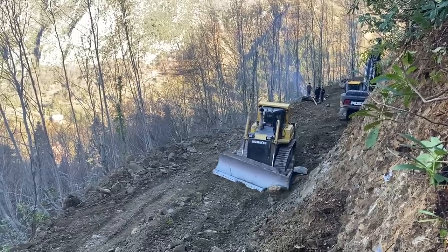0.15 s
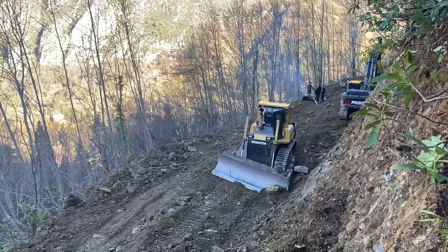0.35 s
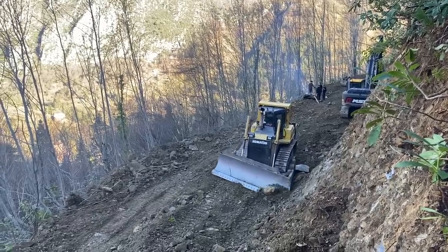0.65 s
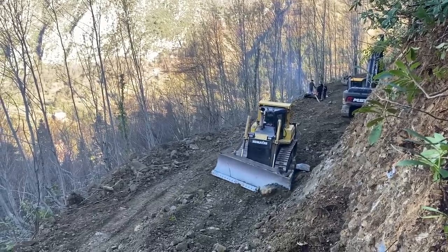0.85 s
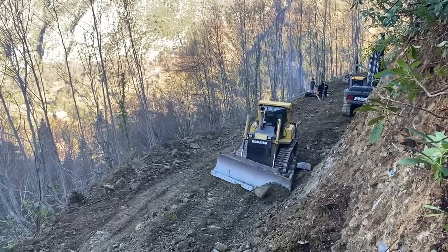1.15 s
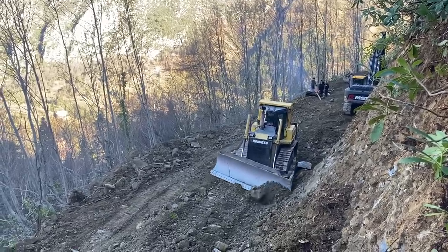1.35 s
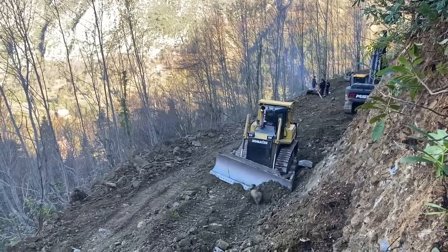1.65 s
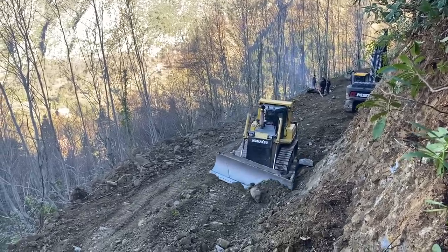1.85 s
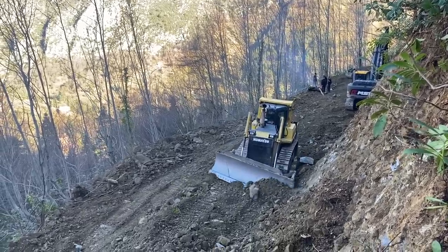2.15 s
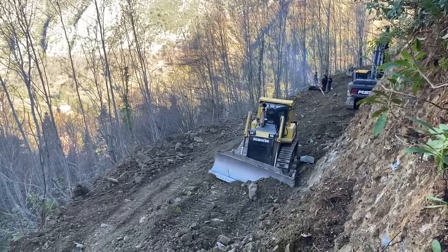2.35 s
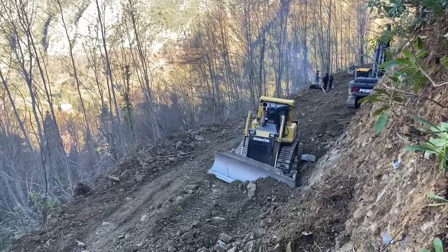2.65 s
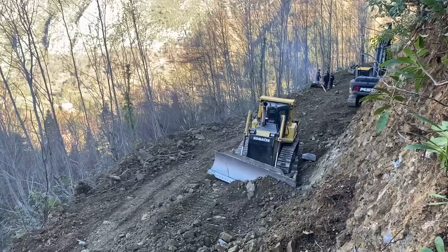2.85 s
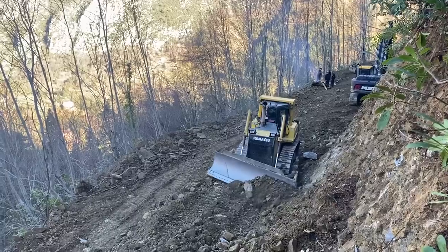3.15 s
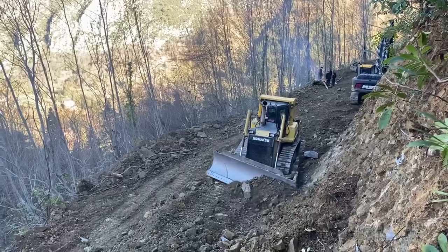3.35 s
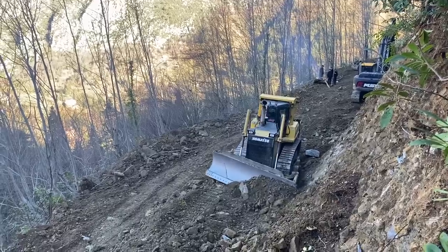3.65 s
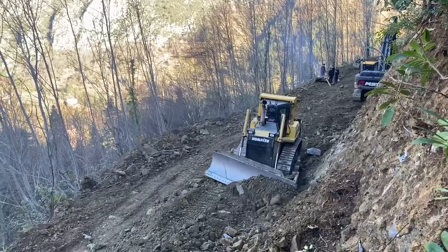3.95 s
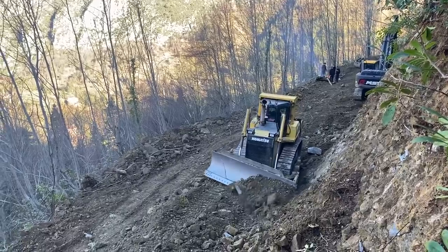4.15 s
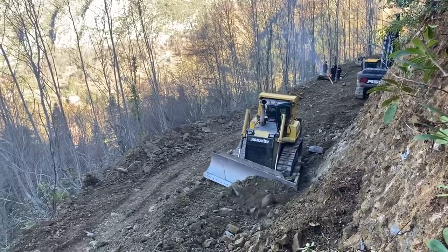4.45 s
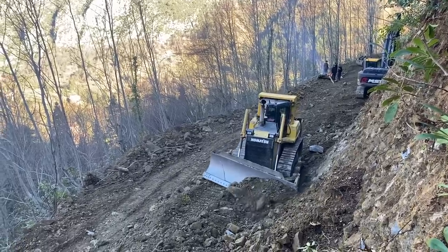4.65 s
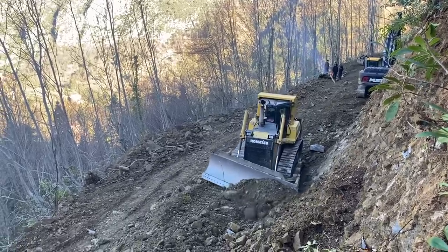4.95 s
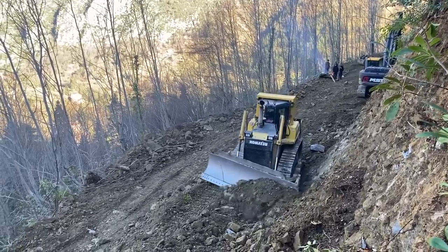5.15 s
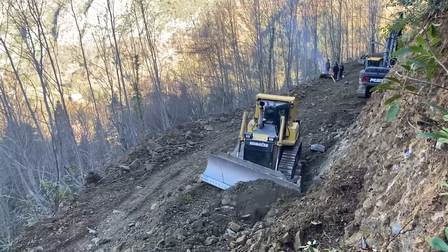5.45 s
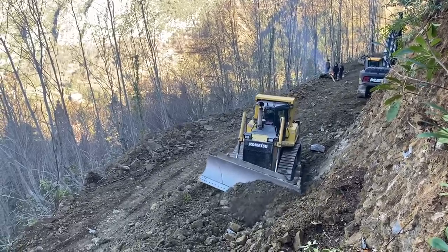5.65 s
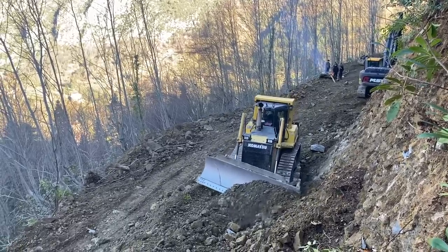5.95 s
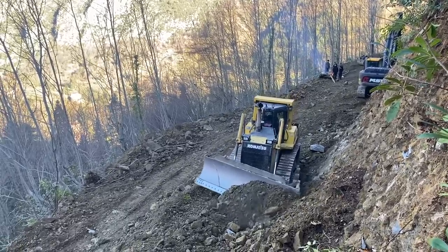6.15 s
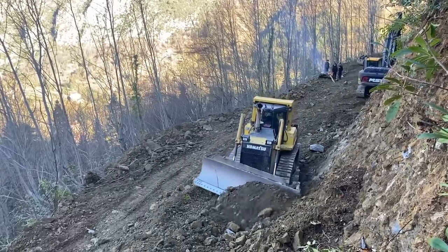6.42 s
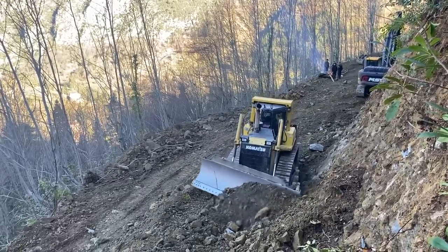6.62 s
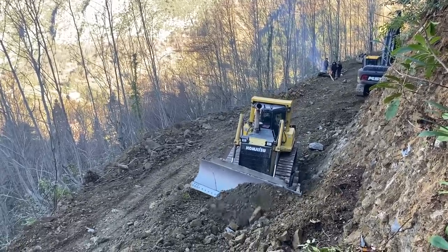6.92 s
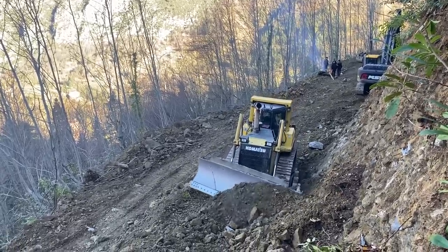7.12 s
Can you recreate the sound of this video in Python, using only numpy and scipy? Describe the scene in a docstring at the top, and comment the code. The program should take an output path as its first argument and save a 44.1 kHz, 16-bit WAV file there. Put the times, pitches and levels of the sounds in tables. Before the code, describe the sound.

A six-cylinder diesel drones low and steadily, clattering, with a very high, thin turbo whistle that climbs. Tracks crunch on stones and the ground rumbles. Scrapes, short stone squeals and knocks come first; a dense burst of heavy thumps, clanks and tumbling rocks follows just after two seconds. Then it calms to engine and sparse knocks, five even track slaps, and a faint gear whine. Open hillside, stereo microphone at some thirty metres.

```python
"""A six-cylinder diesel drones and clatters under a high turbo whistle: a crawler dozer at some thirty metres.
It pushes rocky soil along a hillside track, caught by a microphone with two ports.
Tone lines, a repeating pattern and pulsed noise make the engine; shaped noise makes soil, rumble and groan.
Struck modes make rock and steel ring, sinking tones make boulders thump, wavering tones make stones squeal.
Later the track shoes slap in an even series, and a gear whines near the end."""
import sys
import numpy as np
from scipy import signal
from scipy.fft import rfft, irfft, next_fast_len
from scipy.io import wavfile
from scipy.ndimage import map_coordinates

SR = 44100
rng = np.random.default_rng(int(sys.argv[2]) if len(sys.argv) > 2 else 0)


def bounce(signal):
    """Save signal as a 16-bit WAV file at the path given by the first command-line argument."""
    frames = np.transpose(np.atleast_2d(signal))
    limited = np.clip(frames, -1, 1)
    pcm = np.round(limited * 32767).astype(np.int16)
    wavfile.write(sys.argv[1], SR, pcm)


N = 321048
CYLINDERS = 6
HEAVE_ATTACK_S = 0.019  # shared by the heaves and the groans

# colour of steel grinding on stone, also lent to the valve buzz: freq_hz [Hz], relative_level_db [dB]
GRIND_SPECTRUM = [(110, -32), (165, 1.5), (243, -10), (275, -1), (380, -2.5), (451, -4), (690, -3),
                  (962, -10), (1070, -8.5), (1300, -19), (1440, -15), (2170, -24.5), (2360, -21),
                  (2800, -28), (3640, -59), (6160, -120)]
# colour of a dry crack: freq_hz [Hz], relative_level_db [dB]
CRACK_SPECTRUM = [(600, -21), (1600, -2), (2700, 3.5), (4300, 0.5), (6500, -13), (12000, -47)]
# modes of the soil-damped blade and track frame: mode_hz [Hz], relative_level_db [dB], t60_s [s]
STEEL_MODES = [(386.2, 5, 0.19), (592, 4, 0.074), (727, 6.5, 0.07), (880, 6, 0.071), (1023, -5, 0.13),
               (1185, -9, 0.16), (1433, -4, 0.18), (1854, -10.5, 0.22), (2037, -8.5, 0.12),
               (2454, -7, 0.095), (3060, -31, 0.1), (3104, -8.5, 0.092)]


def amp(db):
    """Decibels to gain."""
    return 10 ** (np.asarray(db) / 20)


def unit(x):
    """Scale to rms 1."""
    return x / np.sqrt(np.mean(x ** 2) + 1e-20)


def along(points, hz):
    """Interpolate (Hz, value) points on a log frequency axis."""
    f, v = np.transpose(points)
    return np.interp(np.log(hz + 1), np.log(f + 1), v)


def curves(rows):
    """One value per sample for each column after the time."""
    s, *cols = np.transpose(rows)
    return [np.interp(np.arange(N) / SR, s, c) for c in cols]


def wobble(rate):
    """A smooth random curve with rate knots a second."""
    knots = rng.standard_normal(int(N * rate / SR) + 4)
    return map_coordinates(knots, [np.arange(N) * rate / SR])


def complex_wobble(rate):
    """A random amplitude and phase, for tones that flutter."""
    return wobble(rate) + 1j * wobble(rate)


def filtered(x, response):
    """Pass x through a complex response of frequency."""
    m = next_fast_len(N + SR // 2)
    return irfft(rfft(x, m) * response(np.fft.rfftfreq(m, 1 / SR)), m)[..., :N]


def noise(response, grain_db=0):
    """Stereo noise of rms 1, roughened by grain_db; scattering on the slope makes the treble less alike."""
    # likeness of left and right: freq_hz [Hz], correlation [0 to 1]
    likeness = [(60, .997), (150, .99), (300, .965), (900, .96), (1500, .75), (2800, .78), (3800, .96),
                (5300, .7), (6700, .96), (8000, .85), (15000, .88)]

    def mid_and_side(hz):
        angle = np.arccos(np.clip(along(likeness, hz), 0, 1)) / 2
        return response(hz) * np.array([np.cos(angle), np.sin(angle)])

    white = rng.standard_normal((2, N))
    if grain_db:
        white = white * amp(grain_db * wobble(1400))
    mid, side = filtered(white, mid_and_side)
    return unit(np.array([mid + side, mid - side]))


def coloured(spectrum, grain_db=0):
    """Stereo noise with a (Hz, dB) spectrum."""
    return noise(lambda hz: amp(along(spectrum, hz)), grain_db)


def swell(start, end, attack, t60):
    """Envelope that rises from the start, holds until the end and dies away."""
    t = np.arange(N) / SR
    return np.clip((t - start) / attack, 0, 1) * amp(-60 * np.clip((t - end) / t60, 0, 3))


def bursts(times, sizes, rise, t60):
    """Envelope of blows that swell and die; their powers add."""
    t = np.arange(SR // 2) / SR
    index = np.clip(np.asarray(times) * SR, 0, N - 1).astype(int)
    power = np.bincount(index, sizes ** 2, N)
    shape = (1 - np.exp(-t / rise)) * amp(-60 * t / t60)
    return np.sqrt(np.abs(signal.fftconvolve(power, shape ** 2)[:N]))


def ringing(modes, times, levels_db, spots_hz, varied_db):
    """Each blow finds the modes at new tunings and phases, strongest near the pitch of the struck spot."""
    hz, mode_db, t60 = np.transpose(modes)[:, :, None]
    t = np.arange(SR // 4) / SR
    out = np.zeros(N + SR)
    for start, db, spot in zip(times, levels_db, spots_hz):
        strength, detune, phase = rng.standard_normal((3, len(modes), 1))
        # the spot lifts nearby modes by up to 6.5 dB, over 0.17 octaves
        spot_db = 6.5 * np.exp(-(np.log2(hz / spot) / 0.17) ** 2)
        level = amp(mode_db + spot_db + varied_db * strength - 60 * t / t60)
        partials = level * np.sin(2 * np.pi * (hz * (1 + 0.0191 * detune) * t + phase))
        blow = partials.sum(0) * (1 - np.exp(-t / .0024))
        # the level sets the strength of the first seventieth of a second
        out[round(start * SR):][:len(t)] += amp(db) * blow / np.std(blow[:SR // 70])
    return out[:N]


def exhaust(cycle, level_db, waver_db, firing_waver_db, jitter):
    """A clean firing tone, with weaker lines from the unequal cylinders."""
    # exhaust lines: order [multiples of the six-firing cycle], relative_level_db [dB]
    exhaust_lines = [(3, -17), (4, -15), (6, 1), (7, -13.5), (9, -15.5), (10, -18), (12, -22.5),
                     (13, -21.5), (14, -28), (15, -25.5), (16, -42), (17, -26), (18, -18), (19, -40),
                     (20, -17.5), (22, -23), (24, -21.5), (27, -23.5), (30, -28), (32, -26), (37, -23.5),
                     (40, -24), (42, -29), (44, -19), (45, -28.5), (48, -41), (59, -25), (69, -27.5),
                     (70, -40), (78, -35)]
    out = np.zeros(N)
    for order, db in exhaust_lines:
        loose_db = firing_waver_db if order == CYLINDERS else waver_db
        phase = order * (cycle + jitter * wobble(12)) + rng.random()
        out += amp(db + loose_db * wobble(7)) * np.sin(2 * np.pi * phase)
    return np.sqrt(2) * amp(level_db) * out


def buzz(cycle, chug_db, order=1024):
    """Valves and gears repeat one pattern every cycle: a comb of faint lines that chugs once a crank turn."""
    pattern = rng.standard_normal(order)
    looped = map_coordinates(pattern, [cycle % 1 * order], mode="grid-wrap")
    chug = amp(chug_db * np.cos(2 * np.pi * 2 * cycle))  # two crank turns a cycle
    return unit(chug * filtered(looped, lambda hz: amp(along(GRIND_SPECTRUM, hz))))


def clatter(cycle, level_db, sharpness, uneven_db, block_db, hiss_db):
    """Each firing raps the resonant block; fan and injectors hiss in the same pulses."""
    # engine block and cover resonances: centre_hz [Hz], width_hz [Hz], relative_level_db [dB]
    block_modes = [(1040, 106, 2), (1494, 250, 0), (1963, 73, 3.5), (2374, 90, -3), (3180, 82, 0.5),
                   (3866, 180, -2.5), (6270, 110, -8)]
    # hiss colour: freq_hz [Hz], relative_level_db [dB]
    hiss_spectrum = [(600, -28), (1500, -1.5), (2800, 2.5), (4400, 3.5), (5400, 0), (6800, 2.5), (8000, -3),
                     (11000, -4), (13000, -3.5), (16000, -23)]

    def block_response(f):
        total = 0
        for k, (centre, width, db) in enumerate(block_modes):
            resonance = 1j * f * width / (centre * centre - f * f + 1j * f * width)
            total = total + (-1) ** k * amp(db) * resonance
        return total

    firing = cycle * CYLINDERS
    index = firing.astype(int)
    cylinder_db = uneven_db * np.cos(2 * np.pi * index / 3)
    firing_db = cylinder_db + rng.standard_normal(N // 100)[index]  # spread of 1 dB
    rap = unit(amp(firing_db) * np.exp(-sharpness * (firing % 1)))
    block = noise(block_response)
    return amp(level_db) * rap * (amp(block_db) * block + amp(hiss_db) * coloured(hiss_spectrum))


def turbo(scattered, spread_hz, flutter_db, skirt_db, skirt_hz):
    """The compressor's blade tone: a steady part, a part scattered by hot, moving air, and a skirt of hiss."""
    # turbocharger whistle, rising overall: time_s [s], whistle_hz [Hz]
    turbo_pitch = [(0, 12300), (0.45, 12600), (0.68, 12100), (1, 12850), (1.65, 12295), (2.3, 13000),
                   (2.7, 13490), (3.2, 13900), (3.85, 14380), (4.65, 14290), (5, 14420), (5.5, 14800),
                   (5.9, 14910), (6.45, 15540), (6.7, 15620), (7.28, 16280)]
    # whistle level by pitch, low above 15.7 kHz: whistle_hz [Hz], level_db [dB]
    whistle_level = [(12200, -45.5), (13100, -47.5), (14000, -42.5), (15550, -41.5), (15720, -47),
                     (15900, -50)]
    hz, = curves(turbo_pitch)
    tone = np.exp(2j * np.pi * np.cumsum(hz) / SR)
    air = 1 + scattered * complex_wobble(spread_hz) + amp(skirt_db) * complex_wobble(skirt_hz)
    level = amp(along(whistle_level, hz) + flutter_db * wobble(13))
    return level * unit(np.real(tone * air))


def work(rolling_db):
    """Levels in dB of ground rumble and grinding: rolling, with the power of each heave on top."""
    # the blade bites into the bank and heaves rock:
    # start_s [s], length_s [s], rumble_db [dB], grinding_db [dB]
    heaves = [(-.03, 0.031, -21, -21.5), (0.093, 0.2, -24, -22), (0.463, 0.17, -23.5, -21.5),
              (0.75, 0.1, -29, -25.5), (0.878, 0.17, -20.5, -24.5), (1.487, 0.049, -26, -30),
              (2.101, 0.089, -20, -21), (2.314, 0.096, -19, -17), (2.477, 0.11, -18.5, -22),
              (2.655, 0.088, -29, -24), (3.022, 0.095, -23, -39), (6.09, 0.045, -25, -40),
              (6.4, 0.058, -37, -35), (7.068, 0.055, -28, -39)]
    rumble = amp(-25.5 - .5 * np.arange(N) / SR) ** 2  # drifts down half a dB a second
    grind = amp(rolling_db) ** 2
    for s, length, rumble_db, grind_db in heaves:
        push = swell(s, s + length, HEAVE_ATTACK_S, t60=0.49)
        rumble = rumble + (amp(rumble_db) * push) ** 2
        grind = grind + (amp(grind_db) * push) ** 2
    return 10 * np.log10(rumble), 10 * np.log10(grind)


def ground_rumble(level_db):
    """The ground shakes under the rolling tracks: low, shaped noise."""
    # rumble colour: freq_hz [Hz], relative_level_db [dB]
    rumble_spectrum = [(15, -26), (30, -24), (44, -3), (56, 2.5), (72, -0.5), (110, -3), (180, -9.5),
                       (250, -16), (500, -58), (1000, -90)]
    return amp(level_db) * coloured(rumble_spectrum)


def blade_groan():
    """The blade groans as it drags over rock, and again once it is full: a narrow band of low noise."""
    # groans: start_s [s], end_s [s], level_db [dB]
    groans = [(0, .91, -27.5), (6.076, 7.28, -32.5)]
    # groaning blade's colour: freq_hz [Hz], relative_level_db [dB]
    blade_spectrum = [(100, -31), (150, 3.5), (172, 5.5), (200, -36), (300, -58)]
    envelope = sum(amp(db) * swell(s, end, HEAVE_ATTACK_S, t60=1.9) for s, end, db in groans)
    return envelope * coloured(blade_spectrum)


def tracks(level_db, scatter_db, t60, bed_db, shoes_db, count=330):
    """Steel shoes and rollers crunch over stones in many small, uneven blows, over a grinding bed."""
    chance = rng.random((count, 2))
    times = (np.arange(count) + 2 * chance[:, 0]) / count * N / SR
    blows = unit(bursts(times, amp(scatter_db * chance[:, 1]), rise=0.00082, t60=t60))
    bed = amp(bed_db) * coloured(GRIND_SPECTRUM)
    shoes = amp(shoes_db) * blows * coloured(GRIND_SPECTRUM)
    return amp(level_db) * (bed + shoes)


def scraping(rough, grit_db, chatter_db):
    """Gravel slides over the blade, and single stones stick and slip into brief, ragged squeals."""
    # gravel runs over the blade: peak_s [s], level_db [dB], rise_s [s], t60_s [s]
    slides = [(.2, -33, .1, 0.28), (.55, -25, 0.069, 0.42), (.66, -33.5, 0.29, 0.98),
              (2.15, -34, 0.13, 0.18), (2.39, -42, .06, 0.94), (2.68, -34, 0.15, 0.81),
              (2.82, -33, 0.11, 0.16)]
    # stones squealing on steel: start_s [s], pitch_hz [Hz], level_db [dB], length_s [s]
    squeals = [(.385, 4500, -37, .025), (.45, 2400, -33, .025), (.645, 5040, -31, .045),
               (.7, 5030, -37, .03), (1.185, 2430, -36, .03), (1.635, 7090, -38, .03),
               (1.89, 3950, -29.5, .028), (2.38, 4600, -33, .025), (2.78, 4550, -32.5, .04),
               (2.815, 5300, -37, .025), (3.03, 2420, -38, .03), (4.572, 4760, -32, .02),
               (5.915, 3260, -31, .025), (7.16, 6550, -38, .015)]
    # scrape noise colour, strong from 1.5 to 8 kHz; the band near 10 kHz is left quiet: # freq_hz [Hz],
    # relative_level_db [dB]
    scrape_spectrum = [(600, -11), (1500, 21), (3000, 14), (4800, 14.5), (6500, 4.5), (7800, 16.5),
                       (10000, -80), (16000, -13)]
    t = np.arange(N) / SR
    flow = amp(-49) ** 2  # power of the soil always spilling off the blade
    for s, db, rise, t60 in slides:
        flow = flow + (amp(db) * swell(s - rise, s, rise, t60)) ** 2
    out = np.sqrt(flow) * amp(grit_db * wobble(150)) * coloured(scrape_spectrum, grain_db=1)
    for s, hz, db, length in squeals:
        stroke = np.sqrt(np.abs(np.sin(np.pi * np.clip((t - s) / length, 0, 1))))
        pitch = hz * (1 + rough * wobble(900))
        grip = unit(amp(chatter_db * wobble(260)))
        out = out + amp(db) * stroke * grip * np.sin(2 * np.pi * np.cumsum(pitch) / SR)
    return out


def knocks(ring_db, grit_db, slope_db):
    """A rock or shoe crushes against the steel, rings it and thuds into the ground; the slope answers."""
    # knocks of rocks and track shoes on the machine; thud and crack are relative to the level:
    # start_s [s], level_db [dB], thud_db [dB], crack_db [dB], struck_spot_hz [Hz]
    machine_knocks = [(0.162, -21.5, 11, -17, 980), (0.2, -22, -1, -9, 800), (0.451, -20, 6, -7, 640),
                      (0.535, -17.5, 5, -8, 653), (0.931, -27, 12, -15, 820), (1.035, -28, 2, -17, 580),
                      (1.158, -18, -3, -15, 556), (1.189, -24, 10, -15, 740), (1.499, -22.5, 3, -12, 1100),
                      (1.643, -19, -2, -21, 750), (1.704, -26, 5, -16, 740), (1.969, -20, 0, -15, 686),
                      (2.1, -23, -5, -15, 850), (2.128, -19, 0, -4, 940), (2.157, -10.5, 6.5, -15, 880),
                      (2.195, -32, -3, -16, 700), (2.328, -10, -6, -12.5, 845), (2.348, -22, -3, -23, 390),
                      (2.372, -15, -2, -9, 621), (2.394, -19.5, 3, -9, 740), (2.441, -21.5, 7, -10, 785),
                      (2.495, -16, -6, -26, 900), (2.518, -23, -3, -18, 390), (2.572, -17, -8, -8, 590),
                      (2.665, -23, 4, -7, 687), (2.756, -19.5, 0, -10, 640), (3.044, -25, 17.5, -18, 520),
                      (3.321, -28, -4, -16, 695), (3.537, -25, 0, -11, 624), (3.797, -23.5, -5, -8.5, 690),
                      (4.078, -28, -1, -16, 552), (4.164, -24.5, -3, -19, 790), (4.349, -22.5, 8, -12, 609),
                      (5.359, -25, -5, -10, 680), (5.564, -23, -1, -16, 1000), (6.26, -32, -3, -22, 560.6),
                      (6.794, -32, -6, -11, 692), (6.866, -27, 0, -15, 588), (6.91, -22, -5, -16, 890),
                      (7.036, -18, -2, -14, 1207)]
    # colours of the crushing and of the ground's thud: freq_hz [Hz], relative_level_db [dB]
    crush_spectrum = [(60, -34), (200, 5.5), (350, 1), (500, 0.5), (720, 0.5), (1050, -0.5), (1280, -13.5),
                      (1500, -11), (2100, -23), (4000, -24), (9000, -50)]
    thud_spectrum = [(20, -38), (45, -18), (74, 6.5), (110, -1), (165, 3), (280, -18), (700, -61)]
    s, db, thud_db, crack_db, spot_hz = np.transpose(list(machine_knocks) + slaps())
    ring = ringing(STEEL_MODES, s, db + ring_db, spot_hz, varied_db=0.5)
    crunch = bursts(s, amp(db), rise=.0025, t60=.1)
    grit = amp(grit_db) * crunch * coloured(crush_spectrum, grain_db=4.0)
    thud = bursts(s, amp(db + thud_db), rise=0.0046, t60=0.079) * coloured(thud_spectrum)
    crack = bursts(s, amp(db + crack_db), rise=.004, t60=.15) * coloured(CRACK_SPECTRUM, grain_db=5)
    slope = bursts(s, amp(db + slope_db), rise=0.03, t60=0.37) * coloured(crush_spectrum)
    return ring + grit + thud + crack + slope


def snaps():
    """A stone splitting under the tracks gives one short, bright crack."""
    # splitting stones: start_s [s], level_db [dB]
    splits = [(.201, -28), (1.636, -33), (2.568, -18.5), (2.575, -29), (6.396, -35)]
    # splitting colour: freq_hz [Hz], relative_level_db [dB]
    split_spectrum = [(1200, -20), (2600, -2), (4400, -2), (5500, 1), (5850, 10), (6250, 3), (6900, 0),
                      (7400, 9), (8100, -3), (11000, -1), (15000, -4)]
    s, db = np.transpose(splits)
    return bursts(s, amp(db), rise=0.00035, t60=0.057) * coloured(split_spectrum)


def screeches(width, chatter_db, waver):
    """A stone dragged along the blade's edge sticks and slips, so each mode swells and sinks on its own."""
    # drags: start_s [s], length_s [s], level_db [dB], brightness [dB per octave], pitch [ratio]
    drags = [(0.47, .04, -36.5, -3, 1.03), (0.515, 0.055, -30, 0, 1.005), (.595, 0.025, -41, 3, 1),
             (0.647, 0.031, -37, -3, .985), (.7, 0.043, -41, -2, .995)]
    # the edge's high modes: mode_hz [Hz], relative_level_db [dB]
    edge_modes = [(2686, -3), (3725, -5), (3978, -7), (4890, -4), (5060, 0), (5303, -1), (6300, -7),
                  (7542, -3), (8285, -1), (11396, -5), (14720, -9)]
    strokes = [swell(s, s + length, .014, t60=0.24) ** 2 for s, length, *_ in drags]
    bend, = curves([(s + length / 2, ratio) for s, length, _, _, ratio in drags])
    clock = np.cumsum(bend + waver * wobble(44.7)) / SR  # the pitch wavers with the contact
    out = np.zeros(N)
    for hz, mode_db in edge_modes:
        drive = np.zeros(N)
        for (_, _, db, bright, _), stroke in zip(drags, strokes):
            drive += amp(db + bright * np.log2(hz / 5000)) ** 2 * stroke
        ring = np.real(complex_wobble(width * hz) * np.exp(2j * np.pi * hz * clock))
        out += amp(mode_db) * np.sqrt(drive) * ring
    return out * amp(chatter_db * wobble(260)) / np.linalg.norm([amp(db) for _, db in edge_modes])


def clanks():
    """A track link drops onto its roller, ringing bare steel; slapping shoes ring their links too."""
    # dropping links: start_s [s], level_db [dB], struck_spot_hz [Hz]
    link_drops = [(.54, -27, 1795), (1.191, -30, 2390), (2.158, -19, 1066), (2.333, -26, 2390),
                  (2.378, -29, 1545), (7.033, -20.5, 1795), (7.039, -22.5, 1210)]
    # the link's modes: mode_hz [Hz], relative_level_db [dB], t60_s [s]
    link_modes = [(610, 4, .07), (820, -3, .05), (1066, -4, .06), (1210, -2, .07), (1545, -7, .07),
                  (1795, -6.5, .07), (2390, -8, .08), (3690, -13, .06)]
    # each slap rings its link 5 dB below the slap, strongest near 1350 Hz
    slapped_links = [(s, db - 5, 1350) for s, db, *_ in slaps()]
    s, db, spot_hz = np.transpose(list(link_drops) + slapped_links)
    return ringing(link_modes, s, db, spot_hz, varied_db=0)


def thumps():
    """The soil gives under a boulder and swings back for a few cycles, sinking in pitch."""
    # boulders rolling over and dropping: start_s [s], peak_db [dB], settled_pitch_hz [Hz]
    boulders = [(.54, -19, 163), (.905, -15, 68), (.955, -10.5, 74), (1.03, -16, 78), (1.105, -17, 65),
                (2.156, -19, 158), (2.176, -11, 66), (2.334, -4, 76.4), (2.375, -11.5, 152.3),
                (2.41, -10, 71), (2.525, -14, 66), (2.601, -11, 68), (2.859, -8, 78), (3.05, -17, 70),
                (3.114, -14, 68), (3.485, -18, 66.4)]
    rise_s, sag = .014, 0.22  # time to the peak; share by which the pitch starts high
    t = np.arange(SR // 4) / SR
    age = t / rise_s
    out = np.zeros(N + SR)
    for s, db, hz in boulders:
        turns = np.cumsum(hz * (1 + sag * np.exp(-age))) / SR
        swing = np.sin(2 * np.pi * (turns + rng.random()))
        out[round(s * SR):][:len(t)] += amp(db) * age * np.exp(1 - age) * swing
    return out[:N]


def tumble(tick_db, count=44):
    """Loose rocks off the heaved pile strike the blade at random spots, each with a dry tick."""
    start_s, end_s, level_db, spread_db = 2.34, 2.84, -32, 4
    chance = rng.random((count, 3))
    s = start_s + (end_s - start_s) * (np.arange(count) + chance[:, 0]) / count
    db = level_db + spread_db * (2 * chance[:, 1] - 1)
    spot_hz = 600 * 4 ** chance[:, 2]
    ticks = bursts(s, amp(db + tick_db), rise=.0005, t60=0.023) * coloured(CRACK_SPECTRUM, grain_db=4)
    return ringing(STEEL_MODES, s, db, spot_hz, varied_db=5) + ticks


def slaps():
    """Evenly spaced blows of the track shoes, as rows like those of the knocks."""
    # each slap in turn: level_db [dB]
    slap_levels = [-18.3, -19.5, -20.5, -29, -26]
    start_s, period_s = 4.601, .279
    thud_db, crack_db, spot_hz = -7, -21, 880  # thud and crack against the slap
    return [(start_s + k * period_s, db, thud_db, crack_db, spot_hz) for k, db in enumerate(slap_levels)]


def rattles(grit_db, count=6):
    """Slack pins and caught pebbles chatter around each slap of the shoes."""
    lead_s, trail_s = .016, .05  # window around the slap
    below_db, spread_db = -12, 3  # level against the slap
    s, db = np.repeat([row[:2] for row in slaps()], count, axis=0).T
    chance = rng.random((len(s), 3))
    place = (np.arange(len(s)) % count + chance[:, 0]) / count
    s = s - lead_s + (lead_s + trail_s) * place
    db = db + below_db + spread_db * (2 * chance[:, 1] - 1)
    spot_hz = 700 * 2 ** chance[:, 2]
    grit = bursts(s, amp(db + grit_db), rise=.001, t60=0.035) * coloured(CRACK_SPECTRUM, grain_db=0.5)
    return ringing(STEEL_MODES, s, db, spot_hz, varied_db=3.5) + grit


def gear(cycle, waver_db):
    """Meshing drive teeth whine late on, at 66 times the engine's cycle."""
    level = amp(-39.5 + waver_db * wobble(8)) * swell(6.1, N / SR, attack=0.36, t60=1)
    return level * np.sqrt(2) * np.sin(2 * np.pi * 66 * cycle)


def scene():
    """One cycle times the engine; heaves lift rumble and grinding; grinding also follows the clatter level."""
    # engine speed, sagging when the blade meets rock: time_s [s], firing_rate_hz [Hz]
    engine_speed = [(0, 94.1), (1.1, 94.26), (2.45, 91.7), (2.85, 92.9), (3.55, 92.8), (4.05, 93.8),
                    (4.75, 94.5), (5.15, 91.44), (5.45, 93.43), (5.8, 92.9), (6.45, 96.18), (7.28, 95)]
    # the engine takes up the load: time_s [s], exhaust_db [dB], clatter_db [dB]
    engine_load = [(0, -26.5, -44), (1.25, -28, -43), (2.1, -21, -42.5), (4.6, -22.5, -41.5),
                   (5.5, -21, -41.5), (7.28, -20, -38.5)]
    firing_hz, = curves(engine_speed)
    exhaust_db, clatter_db = curves(engine_load)
    rumble_db, grind_db = work(rolling_db=clatter_db + 16)
    cycle = np.cumsum(firing_hz) / SR / CYLINDERS
    engine = exhaust(cycle, exhaust_db, waver_db=3.0, firing_waver_db=0.76, jitter=0.0019)
    engine = engine + amp(exhaust_db - 16) * buzz(cycle, chug_db=-0.5)
    engine = engine + clatter(cycle, clatter_db, sharpness=0.13, uneven_db=-0.5, block_db=4.5, hiss_db=6)
    engine = engine + turbo(scattered=0.6, spread_hz=160, flutter_db=2, skirt_db=-5, skirt_hz=900)
    engine = engine + gear(cycle, waver_db=2.5)
    ground = ground_rumble(rumble_db) + blade_groan() + thumps()
    ground = ground + tracks(grind_db, scatter_db=10.5, t60=0.11, bed_db=-2.5, shoes_db=-5.5)
    blows = knocks(ring_db=-3.5, grit_db=4.0, slope_db=-16) + snaps() + clanks()
    blows = blows + tumble(tick_db=-2.5) + rattles(grit_db=-9.5)
    stones = scraping(rough=.014, grit_db=1.8, chatter_db=2.5)
    stones = stones + screeches(width=.014, chatter_db=2.5, waver=.004)
    return engine + ground + blows + stones


def record(dry):
    """Two microphone ports differ in level and phase; deep bass is cut, peaks rounded, the top band-limited."""
    # left port against right: freq_hz [Hz], left_minus_right_db [dB]
    port_tilt = [(200, 0), (400, 1), (500, 3.5), (620, .5), (1000, 1.3), (1300, 8), (1530, 2.5),
                 (1700, 7.5), (1950, 3.6), (2120, 7), (2350, 2.4), (2850, 6), (3200, .5), (4000, 0)]
    # phase by which the left port leads: freq_hz [Hz], lead_rad [radians]
    port_lead = [(200, 0), (400, .25), (600, -.1), (1200, .7), (1400, 0), (2000, .7), (2300, -.3),
                 (4500, 0), (5500, -.5), (7400, 0), (9000, -np.pi), (10500, -2 * np.pi),
                 (11600, -2 * np.pi), (13200, -3 * np.pi), (15100, -4 * np.pi)]
    half = np.array([[.5], [-.5]])  # each port takes half of the difference

    def ports(hz):
        return amp(half * along(port_tilt, hz)) * np.exp(1j * half * along(port_lead, hz))

    bass_cut = signal.butter(N=2, Wn=30, btype="high", fs=SR, output="sos")
    heard = signal.sosfilt(bass_cut, filtered(dry, ports))
    ceiling, top_hz = .95, 16020
    rounded = heard / (1 + np.abs(heard / ceiling) ** 8) ** (1 / 8)
    return filtered(rounded, lambda hz: hz < top_hz)


dry = scene()
out = record(dry)
bounce(out)
```